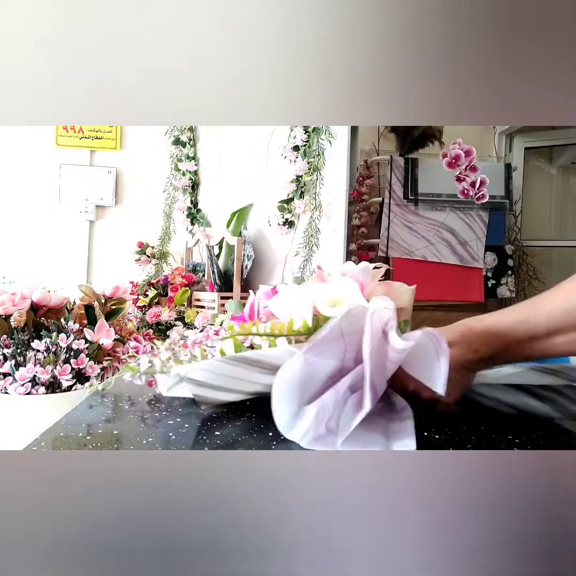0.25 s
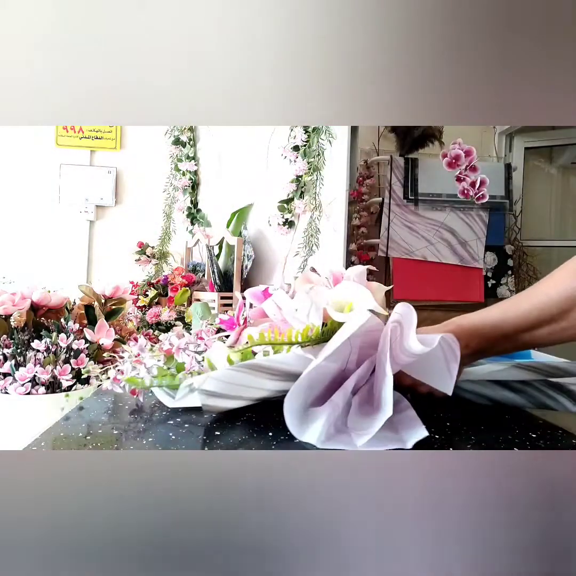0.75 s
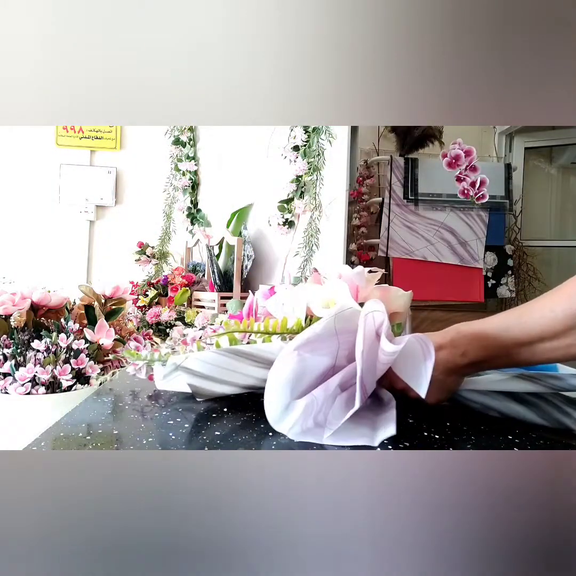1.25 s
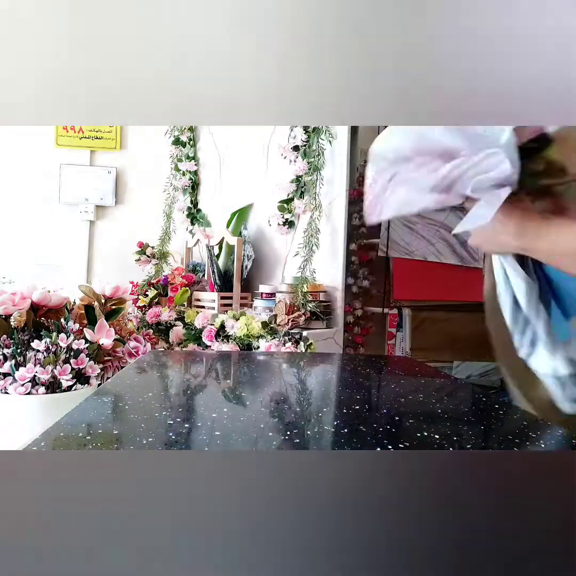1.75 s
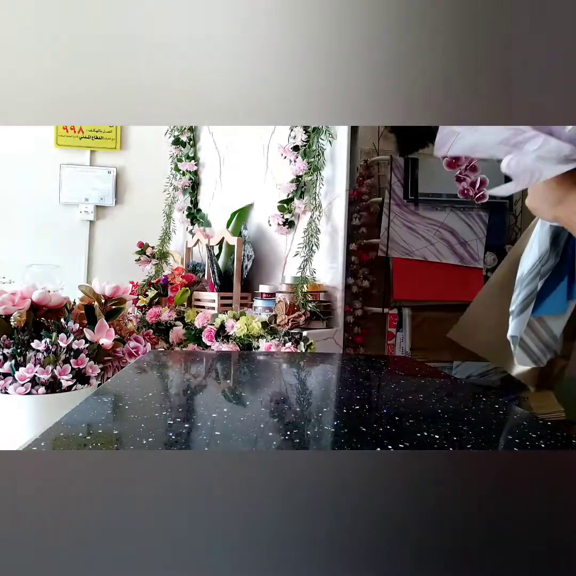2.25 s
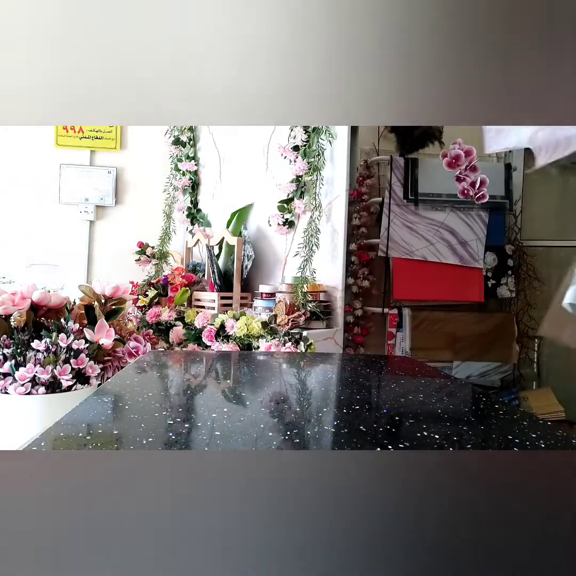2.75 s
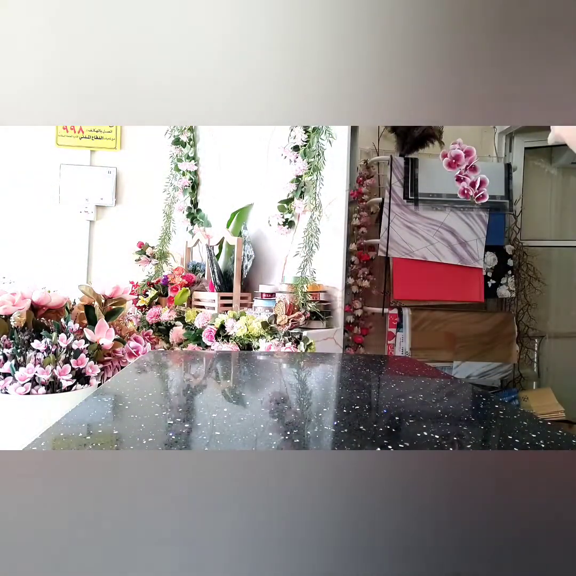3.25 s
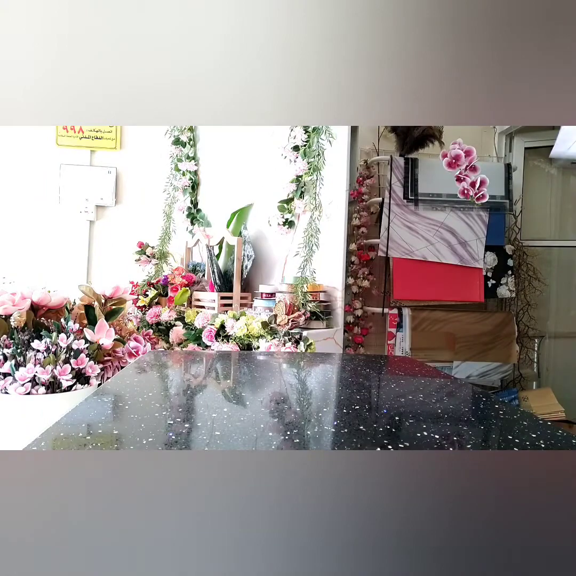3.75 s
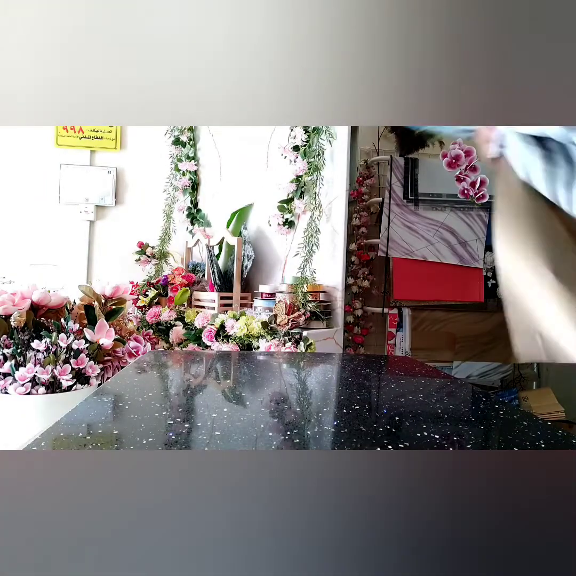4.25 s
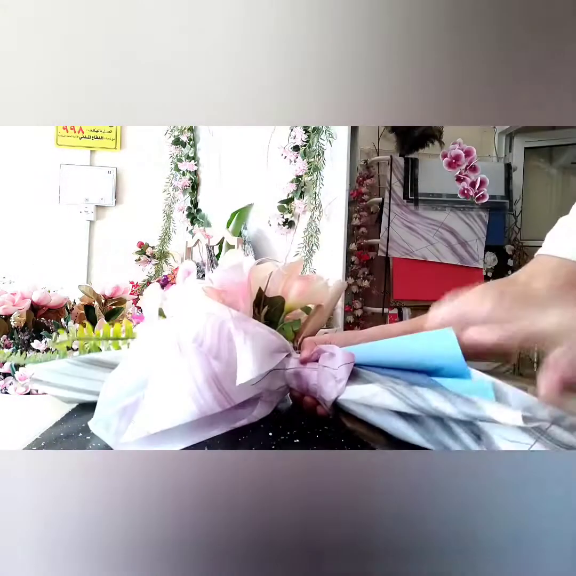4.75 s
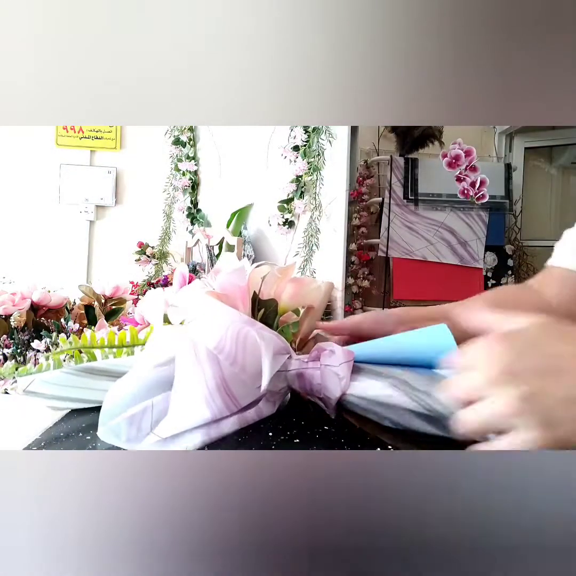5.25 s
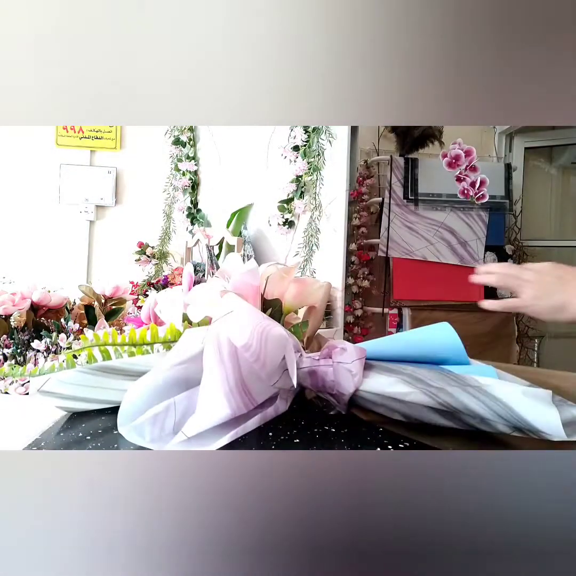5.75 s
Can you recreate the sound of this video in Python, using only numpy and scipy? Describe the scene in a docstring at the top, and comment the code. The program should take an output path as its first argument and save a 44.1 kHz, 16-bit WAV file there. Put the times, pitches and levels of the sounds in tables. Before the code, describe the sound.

Crisp wrapping paper rustles and snaps in irregular bursts close by, with soft bumps on a worktop, over a steady low fan hum.

```python
"""A fan hums and breathes almost steadily in a small room, with paper already rustling over it.
Hands bunch and fold crisp wrapping paper round a bouquet on a worktop, close to a pair of small microphones.
Rustle is many tiny noise puffs swelling with each grip; snaps are short coloured noise cracks with a fold and
sheet behind them; bumps on the worktop are noise through a low resonance. The fan is filtered noise and two sines."""
import sys
import numpy as np
from scipy import signal
from scipy.fft import rfft, irfft
from scipy.io import wavfile

SR = 44100
rng = np.random.default_rng(int(sys.argv[2]) if len(sys.argv) > 2 else 0)


def to_wav(sig):
    """Store sig (one row per channel, or 1-D mono) as 16-bit WAV at the path in sys.argv[1].

    Samples outside -1..1 are clipped; the rate is SR.
    """
    pcm = np.clip(np.atleast_2d(sig), -1, 1) * 32767
    pcm = np.round(pcm).astype(np.int16)
    wavfile.write(sys.argv[1], SR, pcm.T)  # frames by channels


N = 264600


def from_db(db):
    """Decibels to gain."""
    return 10 ** (np.asarray(db) / 20)


def rms_one(x):
    """Scale to rms 1."""
    return x / np.sqrt(np.mean(x ** 2) + 1e-20)


def at_hz(points, hz):
    """Read a (Hz, value) table on a log-frequency axis, flat beyond its ends."""
    table_hz, values = np.transpose(points)
    return np.interp(np.log(hz + 1), np.log(table_hz), values)


def colour(x, spectrum):
    """Causal (minimum-phase) filter with the given dB response."""
    log_gain = np.log(from_db(at_hz(spectrum, np.fft.rfftfreq(4096, 1 / SR))))
    cepstrum = irfft(log_gain)
    # folding the cepstrum onto positive time puts the energy as early as possible
    cepstrum[1:2048] *= 2
    cepstrum[2049:] = 0
    response = irfft(np.exp(rfft(cepstrum)))
    return signal.fftconvolve(np.atleast_2d(x), response[None], axes=1)[:, :N]


def drift(rate_hz):
    """Slow random wander of rms 1: noise through two equal low-pass poles at rate_hz."""
    r = np.exp(-2 * np.pi * rate_hz / SR)
    wander = signal.lfilter([1], [1, -2 * r, r * r], rng.standard_normal(N + SR))
    return rms_one(wander[SR:])  # the first second lets the filter settle


def pair(likeness):
    """White noise for two microphones: a shared part and an opposed part set how alike they are."""
    mid, side = rng.standard_normal((2, N))
    alike = at_hz(likeness, np.fft.rfftfreq(N, 1 / SR))
    shared = np.sqrt((1 + alike) / 2) * rfft(mid)
    opposed = np.sqrt((1 - alike) / 2) * rfft(side)
    return irfft(shared + opposed * [[1], [-1]], N)


def sides(pan_db):
    """Left and right gains for a left-over-right difference in dB."""
    return from_db(np.array([pan_db, -pan_db]) / 2)


# Fan airflow colour. Each row: frequency in Hz, relative level in dB per Hz.
AIRFLOW = [(15, -27), (25, -25), (74, -12), (106, -5.5), (131, 1.5), (192, -6.5), (269, -1), (386, -9.5),
           (463, -4), (600, -16), (797, -14.5), (930, -18), (1640, -23), (5820, -38), (12000, -45.5),
           (15600, -51), (22000, -120)]
# Casing resonances. Each row: frequency in Hz, width in Hz, level in dB rms.
CASING = [(263, 69, -68), (311, 61, -62), (462, 23, -66), (516.4, 14, -61), (807, 35, -62)]
# Motor hum: levels of the first and second harmonic in dB rms.
MOTOR_HUM = [-47, -50]
# Stereo spread of the fan noise. Each row: frequency in Hz, left-right likeness (1 is identical).
FAN_LIKENESS = [(25, 0.98), (60, 0.99), (110, 0.98), (200, 0.99), (380, 0.88), (700, 0.29), (1300, 0.27),
                (3000, 0.034)]
AIRFLOW_DB = -44  # rms
HUM_HZ, HUM_WANDER_HZ, HUM_WAVER_DB = 130.9, .5, 0.3


def fan():
    """Airflow noise, noise ringing in the casing, and a motor hum whose pitch and level wander a little."""
    white = pair(FAN_LIKENESS)
    out = from_db(AIRFLOW_DB) * rms_one(colour(white, AIRFLOW))
    for hz, width_hz, level_db in CASING:
        r = np.exp(-np.pi * width_hz / SR)
        poles = [1, -2 * r * np.cos(2 * np.pi * hz / SR), r * r]
        ringing = signal.lfilter([1, 0, -1], poles, white)
        ringing = signal.lfilter([1, 0, -1], poles, ringing)  # a second pass steepens the skirts
        out = out + from_db(level_db) * rms_one(ringing)
    phase = 2 * np.pi * np.cumsum(HUM_HZ + HUM_WANDER_HZ * drift(3.1)) / SR
    for harmonic, level_db in enumerate(MOTOR_HUM, start=1):
        gain = from_db(level_db + HUM_WAVER_DB * drift(4.4))
        out = out + np.sqrt(2) * gain * np.sin(harmonic * phase)
    return out


ROOM_T60_S, ROOM_DB = .14, -11  # decay by 60 dB; level of the reflections


def room(x):
    """Dense reflections from near walls and shelves: decaying noise that starts 4 ms after the sound."""
    t = np.arange(SR // 3) / SR
    tail = rng.standard_normal((2, len(t))) * from_db(-60 * t / ROOM_T60_S) * (t > .004)
    tail /= np.sqrt(np.sum(tail ** 2, axis=1, keepdims=True))
    return from_db(ROOM_DB) * signal.fftconvolve(x, tail, axes=1)[:, :N]


# Bouquet and sheets bump the worktop. Each row: start in seconds, peak in dB before room and
# microphones, pitch in Hz.
BUMPS = [(0.245, -27, 347), (0.879, -39, 495), (1.107, -38, 435), (1.327, -26, 320), (1.409, -33, 606),
         (2.27, -50, 447), (3.357, -28, 303), (4.546, -34.5, 315), (4.574, -27, 1110), (4.81, -38, 277),
         (5.0365, -20, 980), (5.195, -35, 253), (5.363, -29.5, 496)]
BUMP_RISE_S, BUMP_T60_S = 0.0015, 0.016
BUMP_WIDTH = 0.8  # the band reaches up to 1.8 times the pitch, and down by the same ratio


def thuds():
    """A soft bump: a short puff of noise through one broad low resonance."""
    out = np.zeros((2, N))
    t = np.arange(SR // 10) / SR
    for start_s, peak_db, hz in BUMPS:
        swell = 1 - np.exp(-t / BUMP_RISE_S)
        puff = swell * from_db(-60 * t / BUMP_T60_S) * rng.standard_normal(len(t))
        edges_hz = [hz / (1 + BUMP_WIDTH), hz * (1 + BUMP_WIDTH)]
        band = signal.butter(1, edges_hz, "band", fs=SR, output="sos")
        bump = signal.sosfilt(band, signal.sosfilt(band, puff))
        at = round(start_s * SR)
        out[:, at:at + len(t)] += from_db(peak_db) * bump / np.max(np.abs(bump))
    return out


# Grips and folds of the hands. Each row: time at full strength in seconds, hold in seconds, rustle
# level in dB, large-sheet flap in dB relative to it, swelling in dB per second, dying away in dB per second.
HAND_GRIPS = [(0.0, 0.093, -48.5, -3, 400, 400), (0.168, 0.01, -42.5, -2.5, 280, 250),
              (0.242, 0.063, -35.5, -4.5, 310, 212), (0.47, 0.062, -45.5, -5, 300, 207),
              (0.545, 0.0064, -38, -5, 200, 200), (0.6, 0.049, -44.5, -4, 100, 300),
              (0.72, 0.024, -46, -12.5, 300, 200), (0.93, 0.056, -52, 0, 200, 300),
              (0.797, 0.0045, -36, -10.5, 400, 139), (0.876, 0.0035, -40, 0.5, 130, 253),
              (1.063, 0.029, -35.5, -6, 446, 104), (1.101, 0.018, -30.5, -12, 233, 228),
              (1.32, 0.023, -38.5, -5, 247, 97), (1.411, 0.014, -30.5, -9.5, 153, 285),
              (1.482, 0.1, -47, 0, 200, 111.1), (1.76, 0.01, -43.5, -12, 162, 100),
              (1.83, 0.05, -51, -4, 150, 200), (1.938, .005, -39.5, -8.5, 300, 292),
              (2.195, .005, -50.5, -13, 150, 250), (2.248, 0.024, -36.5, -11, 910, 170),
              (2.31, 0.063, -42, -6, 200, 350), (2.564, 0.01, -36, -9.5, 373, 312),
              (2.856, 0.0036, -39, -8, 426, 143), (2.993, 0.0036, -41.5, -8.5, 150, 352),
              (3.231, 0.0039, -52.5, -4, 330, 230), (3.363, 0.0048, -30, -14.5, 404, 348),
              (3.458, 0.0071, -41, -8.5, 500, 222), (3.607, 0.058, -39, -8, 503, 200),
              (3.756, 0.0032, -41, -13, 259, 320), (3.803, 0.0029, -38.5, -26, 700, 443),
              (3.947, 0.0045, -51.5, -1.5, 700, 40), (4.01, 0.027, -42, -10, 650, 99),
              (4.064, 0.012, -39.5, -3, 200, 182), (4.425, 0.0038, -50, -20, 130, 330),
              (4.514, 0.03, -30.5, -18, 600, 210), (4.567, 0.0084, -32, 0, 248, 233),
              (4.775, 0.014, -42, 1, 900, 200), (4.817, 0.0074, -33.5, -8, 245, 310),
              (4.896, 0.0025, -32.5, -2.5, 553, 425), (4.977, 0.024, -31, -9.5, 1400, 150),
              (5.05, 0.1, -36.5, -2.5, 200, 300), (5.198, 0.019, -31.5, -4.5, 700, 272),
              (5.374, 0.11, -37, -8.5, 460, 230), (5.91, 0.007, -59, -17, 102, 100)]
# Faint crackle between grips. Each row: time in seconds, level in dB.
FAINT_CRACKLE = [(0, -51), (1.6, -82), (2.1, -62), (3, -65), (3.9, -75), (4.7, -85), (5.3, -63), (6, -68)]
FAINT_FLAP_DB = -5  # sheet flap relative to the faint crackle


def handling():
    """Every grip swells, holds and dies away over the faint crackle; gives the gains of rustle and flap."""
    full_s, hold_s, level_db, flap_db, rise, fall = np.transpose(HAND_GRIPS)[:, :, None]
    t = np.arange(0, N + 64, 64) / SR  # a coarse grid is enough for slow gains
    before_s = np.maximum(full_s - t, 0)
    after_s = np.maximum(t - full_s - hold_s, 0)
    grip_db = level_db - rise * before_s - fall * after_s
    faint_db = np.interp(t, *np.transpose(FAINT_CRACKLE))
    gains = []
    for grips_db, rest_db in [(grip_db, faint_db), (grip_db + flap_db, faint_db + FAINT_FLAP_DB)]:
        power = np.sum(from_db(grips_db) ** 2, axis=0) + from_db(rest_db) ** 2
        gains.append(np.interp(np.arange(N) / SR, t, np.sqrt(power)))
    return gains


# Stereo spread of the paper noise. Each row: frequency in Hz, left-right likeness (1 is identical).
PAPER_SPREAD = [(250, 1), (450, 0.48), (800, 1), (1300, 0.41), (2000, 0.068), (3300, 0.3), (6000, 0.013)]
PUFF_RISE_S = .0006


def bursts(clicks, t60_s):
    """Each click opens a puff of noise that swells briefly and falls 60 dB in t60_s."""
    rise = np.exp(-1 / (PUFF_RISE_S * SR))
    envelope = signal.lfilter([1], [1, -from_db(-60 / (t60_s * SR))], clicks + 1e-18)
    envelope = signal.lfilter([1 - rise], [1, -rise], envelope)
    return envelope * np.clip(pair(PAPER_SPREAD), -1.5, 1.5)  # clipped so no stray peak stands out


BUCKLES_PER_S, BUCKLE_SPREAD_DB, CLUMP_DB = 600, 2.5, 2


def buckling(t60_s, spectrum):
    """Tiny buckles come by chance, their strength rising in clumps, a few much larger than the rest; rms 1."""
    born = rng.random(N) < BUCKLES_PER_S / SR
    size_db = BUCKLE_SPREAD_DB * np.minimum(rng.exponential(1, N), 5) + CLUMP_DB * drift(31)
    return rms_one(colour(bursts(born * from_db(size_db), t60_s), spectrum))


# Creases of different size crackle at their own pitch: a list of pitches in Hz.
CREASE_PITCHES = [1900, 2970, 4070, 5010, 6280, 8000, 9000, 14160]
# Overall colour of the sliding creases. Each row: frequency in Hz, level in dB.
RUSTLE_COLOUR = [(1000, -16.5), (2000, -2.5), (3500, 1), (6000, -1.5), (9000, -3.5), (16000, 7)]
# Colour of larger areas flexing, also heard in the snaps. Each row: frequency in Hz, level in dB per Hz.
SHEET_COLOUR = [(200, -3), (400, -0.5), (800, -0.5), (1600, -0.5), (3000, -7.5), (6000, -17)]
CREASE_T60_S, SHEET_T60_S = 0.008, 0.037
PITCH_PEAK_DB = 17  # each crease size stands this far above its level an octave away
SIZE_SHIFT_DB = 2.5  # each crease size comes and goes
PAN_WANDER_DB = 2.5  # the hands work a little left or right


def rustle():
    """Creases of every size and the whole sheet buckle in their own time under the same hands."""
    level, flap = handling()
    creases = 0
    for hz in CREASE_PITCHES:
        peak = [(hz / 2, -PITCH_PEAK_DB), (hz, 0), (hz * 2, -PITCH_PEAK_DB)]
        creases = creases + from_db(SIZE_SHIFT_DB * drift(27.0)) * buckling(CREASE_T60_S, peak)
    creases = rms_one(colour(creases, RUSTLE_COLOUR))
    sheet = buckling(SHEET_T60_S, SHEET_COLOUR)
    return sides(PAN_WANDER_DB * drift(4.2)) * (level * creases + flap * sheet)


SMALL_PER_S, SMALL_T60_S, SMALL_PAN_SPREAD_DB = 16, 0.004, 2.5
SMALL_DB, SMALL_SPREAD_DB = -8.5, 5.5  # mean crack relative to the rustle gain, and its spread
SMALL_FOLD_DB, SMALL_SHEET_DB = -19, -7  # relative to the crack


def small_snaps():
    """Rows like the loud snaps, born by chance at any time, with levels that follow the hands."""
    at = np.flatnonzero(rng.random(N - SR // 10) < SMALL_PER_S / SR)
    chance, same = rng.standard_normal((len(at), 3)), np.ones(len(at))
    rustle_gain = handling()[0][at]
    level_db = 20 * np.log10(rustle_gain) + SMALL_DB + SMALL_SPREAD_DB * chance[:, 0]
    pitch_hz = 7000 * 1.6 ** chance[:, 1]
    return np.transpose([at / SR, level_db, SMALL_FOLD_DB * same, SMALL_SHEET_DB * same, pitch_hz,
                         SMALL_T60_S * same, SMALL_PAN_SPREAD_DB * chance[:, 2]])


# The loudest folds that snap. Each row: start in seconds, crack level in dB rms over its first moments
# before panning, fold in dB relative to it, sheet in dB relative to it, crack pitch in Hz, time to fall
# 60 dB in seconds, left over right in dB.
LOUD_SNAPS = [(0.1197, -46.0, -19.0, -7.0, 9000.0, 0.007, -5.0),
              (0.1312, -38.0, -7.0, -13.0, 5300.0, 0.005, -3.0),
              (0.1618, -39.0, -7.0, -16.0, 6200.0, 0.007, 0.0),
              (0.1768, -30.0, -4.0, -18.0, 5000, 0.006, -2.0),
              (0.2347, -38.0, 2.0, -13.0, 5000, 0.011, 0.0), (0.2452, -35.0, -3.0, -5.0, 5000, 0.011, -2.0),
              (0.2718, -34.0, -8.0, -9.0, 6200.0, 0.008, 6.0),
              (0.3159, -36.0, -3.0, -13.0, 5000, 0.008, 4.0),
              (0.3769, -41.0, -11.0, -6.0, 8100.0, 0.011, -3.0),
              (0.4777, -43.0, -6.0, -9.0, 9400.0, 0.007, 3.0),
              (0.5062, -27.0, -8.0, -20.0, 8500.0, 0.007, -1.0),
              (0.5128, -37.0, -1.0, -17.0, 5100.0, 0.009, 0.0),
              (0.5475, -36.0, -9.0, -11.0, 11800.0, 0.011, 2.0),
              (0.6755, -46.0, -5.0, -7.0, 6100.0, 0.009, 0.0),
              (0.6953, -39.0, -3.0, -17.0, 5000, 0.006, -4.0),
              (0.7372, -44.0, -7.0, -5.0, 5000, 0.011, -1.0),
              (0.7799, -36.0, -2.0, -13.0, 5000, 0.011, -1.0),
              (0.7888, -38.0, -5.0, -10.0, 8300.0, 0.011, -1.0),
              (0.7943, -27.0, -17.0, -26.0, 9000.0, 0.003, -4.0),
              (0.8047, -34.0, -12.0, -19.0, 11600.0, 0.011, 2.0),
              (0.8591, -44.0, -1.0, -10.0, 5000, 0.009, -3.0),
              (0.8815, -38.0, -2.0, -4.0, 9200.0, 0.011, -5.0),
              (0.9462, -48.0, -10.0, -9.0, 5500.0, 0.011, -7.0),
              (1.084, -25.0, -12.0, -18.0, 8400.0, 0.01, 0.0),
              (1.1111, -29.0, -5.0, -17.0, 7200.0, 0.011, 0.0),
              (1.1264, -27.0, -11.0, -19.0, 8500.0, 0.006, -4.0),
              (1.3142, -36.0, -11.0, -11.0, 8500.0, 0.011, -2.0),
              (1.3637, -36.0, -13.0, -9.0, 11500.0, 0.011, 5.0),
              (1.4085, -22.0, -7.0, -11.0, 8300.0, 0.008, -5.0),
              (1.4139, -32.0, 0.0, -10.0, 5000, 0.011, 5.0),
              (1.48, -43.0, -6.0, -3.0, 10000.0, 0.011, -1.0),
              (1.5085, -46.0, 0.0, -2.0, 5000, 0.011, -3.0), (1.5265, -43.0, 0.0, -7.0, 5600.0, 0.01, 0.0),
              (1.5824, -41.0, -6.0, -16.0, 10000.0, 0.01, -4.0),
              (1.7415, -43.0, -8.0, -8.0, 11700.0, 0.007, 4.0),
              (1.7577, -42.0, -2.0, -6.0, 5000, 0.011, -2.0),
              (1.9419, -39.0, -13.0, -17.0, 7300.0, 0.011, 4.0),
              (2.2344, -40.0, -8.0, -16.0, 5000.0, 0.011, -2.0),
              (2.2459, -30.0, -7.0, -18.0, 11700.0, 0.005, 1.0),
              (2.3138, -37.0, -13.0, -13.0, 11800.0, 0.011, 5.0),
              (2.3554, -42.0, -3.0, -15.0, 8800.0, 0.01, -7.0),
              (2.3637, -43.0, -4.0, -16.0, 5000, 0.011, -2.0),
              (2.5379, -45.0, -8.0, -11.0, 5000, 0.006, -1.0),
              (2.5597, -39.0, -6.0, -16.0, 8900.0, 0.007, 0.0),
              (2.5743, -38.0, -9.0, -16.0, 11800.0, 0.011, 4.0),
              (2.5849, -39.0, -9.0, -11.0, 11800.0, 0.011, 4.0),
              (2.8544, -40.0, -9.0, -7.0, 9600.0, 0.011, -1.0),
              (2.9894, -41.0, -7.0, -14.0, 5000, 0.011, -3.0),
              (2.9927, -44.0, -6.0, -10.0, 10600.0, 0.011, 4.0),
              (3.226, -52.0, -2.0, 0.0, 5000, 0.011, -2.0), (3.3168, -45.0, -4.0, -12.0, 5000, 0.009, 7.0),
              (3.3476, -37.0, -6.0, -15.0, 5000, 0.008, -3.0),
              (3.3579, -22.0, -10.0, -17.0, 11700.0, 0.006, 3.0),
              (3.3756, -32.0, -7.0, -24.0, 5000.0, 0.011, 3.0),
              (3.4586, -43.0, -6.0, -6.0, 5200.0, 0.011, -1.0),
              (3.4965, -42.0, -3.0, -13.0, 9500.0, 0.009, -3.0),
              (3.5838, -47.0, -7.0, -13.0, 5000.0, 0.011, -1.0), (3.6025, -38, -4, -14, 9000, 0.008, 0),
              (3.6219, -41.0, -10.0, -14.0, 9200.0, 0.011, 0.0), (3.6378, -24, -12, -26, 11500, 0.005, 2),
              (3.6401, -18.0, -15.0, -29.0, 9400.0, 0.003, -1.0), (3.6492, -32, -10, -20, 10000, 0.011, 0),
              (3.7558, -40.0, -8.0, -7.0, 9000.0, 0.011, -4.0),
              (3.76, -41.0, -8.0, -16.0, 5000, 0.011, -2.0),
              (3.8008, -33.0, -1.0, -16.0, 5000, 0.008, -2.0),
              (4.0297, -39.0, -9.0, -9.0, 5000, 0.011, -1.0),
              (4.0333, -38.0, -8.0, -10.0, 10700.0, 0.011, 1.0),
              (4.0511, -40.0, -8.0, -13.0, 9600.0, 0.011, -4.0),
              (4.069, -34.0, -7.0, -18.0, 8600.0, 0.011, -2.0),
              (4.0862, -44.0, 1.0, -2.0, 5000, 0.011, 1.0), (4.1321, -46.0, -2.0, -6.0, 5000, 0.01, -3.0),
              (4.1443, -47.0, -8.0, -7.0, 5000, 0.006, -7.0),
              (4.1669, -45.0, -4.0, -11.0, 7100.0, 0.01, -3.0), (4.3924, -50.0, 1.0, 0.0, 5000, 0.011, 2.0),
              (4.4931, -39.0, -9.0, -18.0, 8800.0, 0.009, -1.0),
              (4.5079, -24.0, -10.0, -19.0, 5000.0, 0.011, -5.0),
              (4.5274, -32.0, -12.0, -18.0, 9600.0, 0.011, -1.0),
              (4.5411, -25.0, -9.0, -13.0, 8400.0, 0.011, 0.0),
              (4.5633, -27.0, -2.0, -9.0, 5000, 0.011, -5.0), (4.5725, -31.0, 3.0, -2.0, 5000, 0.009, -4.0),
              (4.5942, -32.0, -8.0, -14.0, 8800.0, 0.008, -7.0),
              (4.6451, -46.0, -4.0, -11.0, 6500.0, 0.008, -4.0),
              (4.7728, -37.0, 3.0, -10.0, 5000, 0.011, -6.0), (4.7908, -40.0, 1.0, -7.0, 5000, 0.011, -3.0),
              (4.8131, -31.0, -8.0, -10.0, 9700.0, 0.011, -6.0),
              (4.8235, -29.0, -4.0, -15.0, 5400.0, 0.011, -5.0),
              (4.8414, -33.0, -12.0, -19.0, 8400.0, 0.011, 3.0),
              (4.8537, -36.0, -3.0, -12.0, 11000.0, 0.011, 4.0),
              (4.8839, -37.0, -7.0, -16.0, 5700.0, 0.011, -1.0),
              (4.8934, -28.0, -6.0, -13.0, 5000, 0.011, -5.0),
              (4.9007, -35.0, -7.0, -11.0, 5000, 0.011, -1.0),
              (4.906, -40.0, -3.0, -9.0, 5300.0, 0.005, 1.0),
              (4.9681, -34.0, -2.0, -15.0, 5000, 0.011, -3.0),
              (4.9856, -40.0, 4.0, -8.0, 5000, 0.003, -4.0),
              (4.9992, -27.0, -6.0, -21.0, 8400.0, 0.007, -3.0),
              (5.0147, -26.0, -7.0, -13.0, 7900.0, 0.011, -4.0),
              (5.0367, -26.0, -8.0, -6.0, 5000, 0.011, -5.0),
              (5.0517, -25.0, -8.0, -15.0, 5000, 0.011, -4.0),
              (5.0838, -34.0, -8.0, -15.0, 8000.0, 0.006, -4.0),
              (5.1264, -26.0, -10.0, -14.0, 6700.0, 0.011, -1.0),
              (5.1491, -23.0, -10.0, -22.0, 9000.0, 0.005, -6.0),
              (5.1926, -24.0, -6.0, -20.0, 6000.0, 0.005, -7.0),
              (5.2046, -32.0, -7.0, -19.0, 5300.0, 0.011, -2.0),
              (5.2161, -35.0, -8.0, -15.0, 7800.0, 0.011, -1.0),
              (5.2345, -39.0, 1.0, -4.0, 5000.0, 0.006, -2.0),
              (5.2752, -40.0, -12.0, -14.0, 8800.0, 0.011, -3.0),
              (5.3733, -36.0, -10.0, -7.0, 8200.0, 0.006, -5.0),
              (5.3813, -41.0, -5.0, -7.0, 5000, 0.011, -3.0),
              (5.4027, -35.0, -9.0, -16.0, 9000.0, 0.008, -1.0),
              (5.4142, -33.0, -8.0, -24.0, 5000.0, 0.011, -1.0),
              (5.4694, -17.0, -13.0, -24.0, 8300.0, 0.007, 0.0), (5.4722, -27, -10, -20, 10000, 0.011, 0),
              (5.4813, -31.0, -15.0, -24.0, 8800.0, 0.01, -2.0),
              (5.5594, -52.0, -1.0, -6.0, 5000, 0.011, -2.0)]
# Crack colour of small creases. Each row: frequency in Hz, level in dB per Hz.
CRACK_COLOUR = [(1500, -22), (3000, -14), (5000, -6), (7000, -1), (9000, 1), (12000, 3), (16000, 5)]
# Colour of wider folds. Each row: frequency in Hz, level in dB per Hz.
FOLD_COLOUR = [(1000, -14), (2000, -4), (3500, 0), (5000, -3), (9000, -15)]
PITCH_LIFT_DB, PITCH_WIDTH_OCTAVES = 7, .3  # bump in the crack colour at its own pitch
SNAP_LIKENESS = .1  # left-right
SNAP_RISE_S, SNAP_HOLD_S, SHUDDER_T60_S = .00015, .0007, .012
LEVEL_SPAN_S = .0025  # the first moments over which a snap's level is set


def snaps():
    """A fold gives way: a bright crack at its own pitch, a duller knock and a shudder of the sheet."""
    rows = np.vstack([LOUD_SNAPS, small_snaps()])
    start_s, crack_db, fold_db, sheet_db, pitch_hz, t60_s, pan_db = rows.T[:, :, None]
    size = 2048
    t, hz = np.arange(size) / SR, np.fft.rfftfreq(size, 1 / SR) + 1
    octaves_off = np.log2(hz / pitch_hz)
    pitch_lift_db = PITCH_LIFT_DB * np.exp(-(octaves_off / PITCH_WIDTH_OCTAVES) ** 2 / 2)
    layers = [(0, t60_s, at_hz(CRACK_COLOUR, hz) + pitch_lift_db),
              (fold_db, t60_s, at_hz(FOLD_COLOUR, hz)),
              (sheet_db, SHUDDER_T60_S, at_hz(SHEET_COLOUR, hz))]
    events = 0
    for share_db, dying_s, colour_db in layers:
        mid, side = np.moveaxis(rng.standard_normal((len(rows), 2, size)), 1, 0)
        opposed = np.sqrt(1 - SNAP_LIKENESS) * side * [[[1]], [[-1]]]
        stereo = np.sqrt(1 + SNAP_LIKENESS) * mid + opposed
        noise = irfft(rfft(stereo) * from_db(colour_db))
        swell = 1 - np.exp(-t / SNAP_RISE_S)
        puff = noise * swell * from_db(-60 * np.maximum(t - SNAP_HOLD_S, 0) / dying_s)
        first_rms = np.std(puff[..., :round(LEVEL_SPAN_S * SR)], axis=2, keepdims=True)
        events = events + from_db(crack_db + share_db) * puff / first_rms
    panned = np.moveaxis(events * sides(pan_db), 1, 0)
    out = np.zeros((2, N + size))
    for at, event in zip(np.round(start_s[:, 0] * SR).astype(int), panned):
        out[:, at:at + size] += event
    return out[:, :N]


RIGHT_LAG_S = 0.00019


def scene():
    """Paper and bumps in the room over the fan; the right microphone hears all a little later."""
    paper = rustle() + snaps() + thuds()
    left, right = paper + room(paper) + fan()
    lag = round(RIGHT_LAG_S * SR)
    return np.vstack([left, np.concatenate([right[:lag], right])[:N]])


# Each microphone port has its own treble resonance with a deep dip above it.
# Each row: frequency in Hz, gain in dB.
LEFT_PORT = [(5000, -0.5), (7500, 4), (10000, 5.5), (11900, 10.5), (12200, -34), (12600, 0.5),
             (13700, -3.5), (15500, -11)]
RIGHT_PORT = [(5000, -1), (7200, 4), (9000, 9.5), (10000, 5.5), (11900, -0.5), (12500, -23), (13100, -26),
              (13600, -26), (14200, -40), (15500, -15)]
HEADROOM, CUTOFF_HZ = 1.3, 16100  # ceiling of the rounding (1 is full scale); top of the band


def record(dry):
    """Each microphone adds its colour, the loudest peaks are rounded, the top is cut."""
    coloured = np.vstack([colour(dry[0], LEFT_PORT), colour(dry[1], RIGHT_PORT)])
    rounded = HEADROOM * np.tanh(coloured / HEADROOM)
    return signal.sosfilt(signal.cheby2(20, 60, CUTOFF_HZ, fs=SR, output="sos"), rounded)


dry = scene()
out = record(dry)
to_wav(out)
```